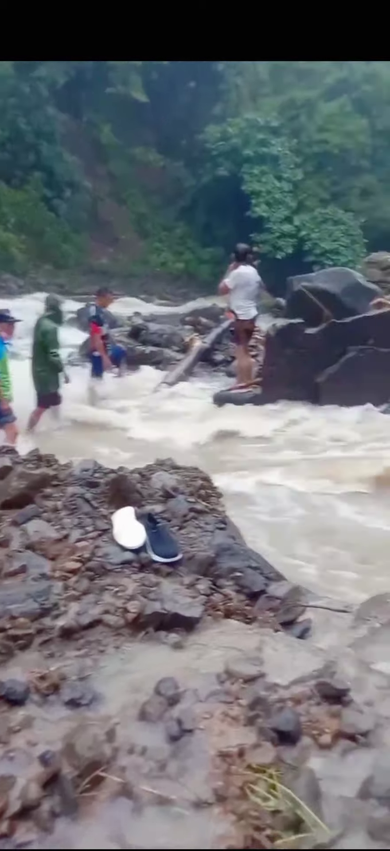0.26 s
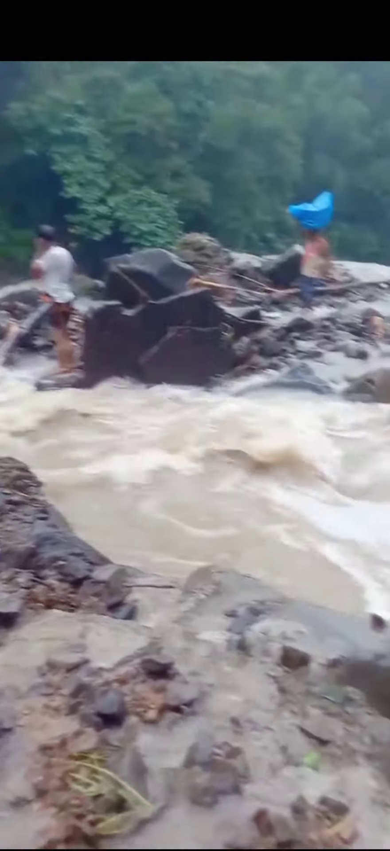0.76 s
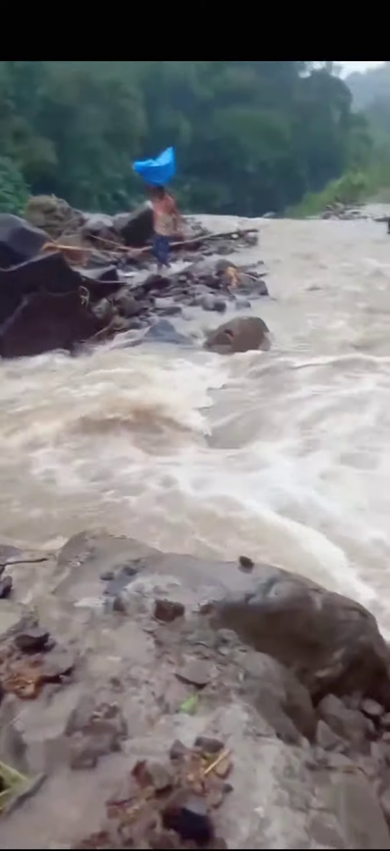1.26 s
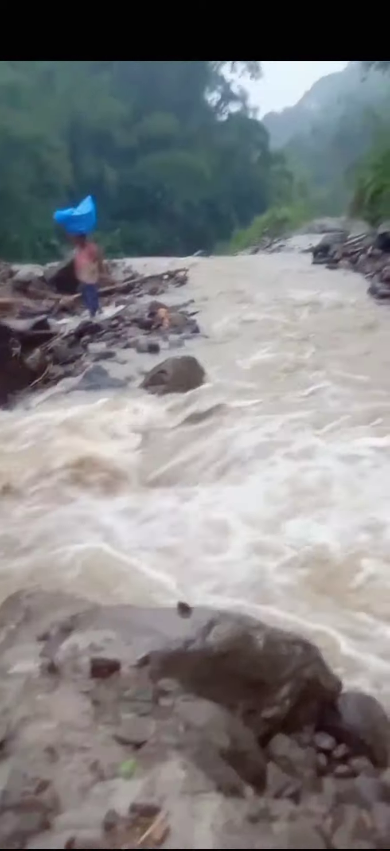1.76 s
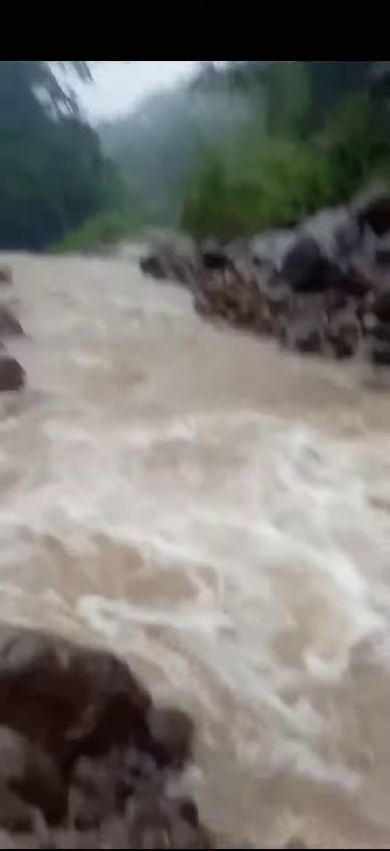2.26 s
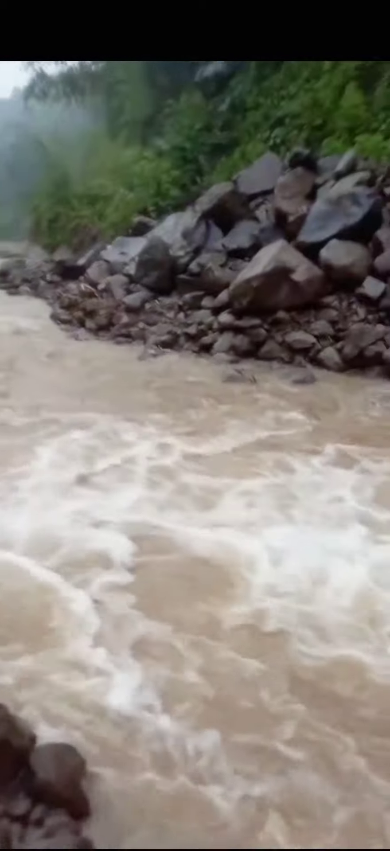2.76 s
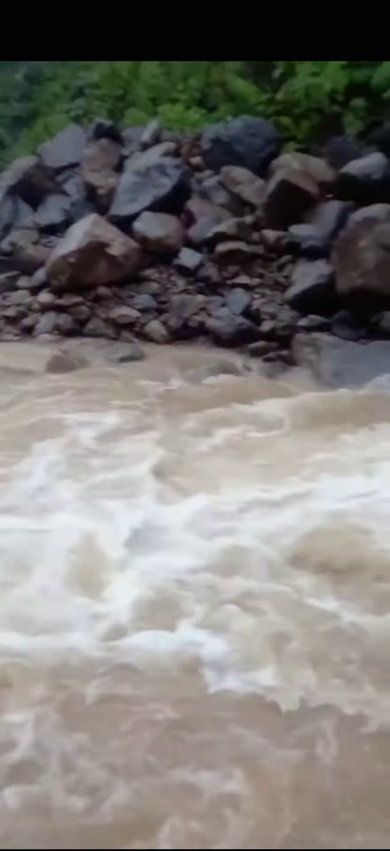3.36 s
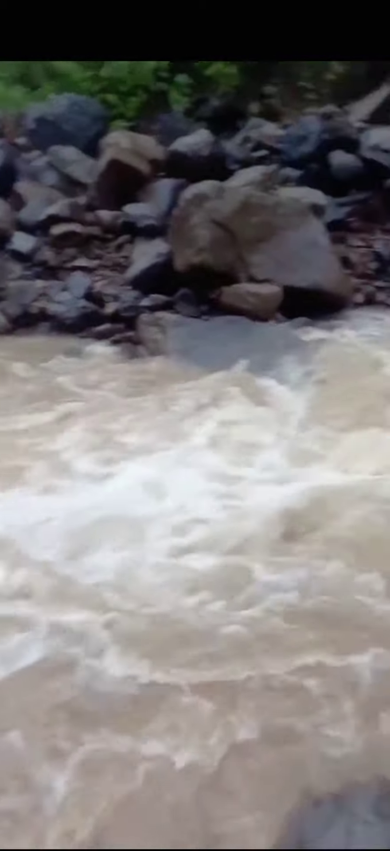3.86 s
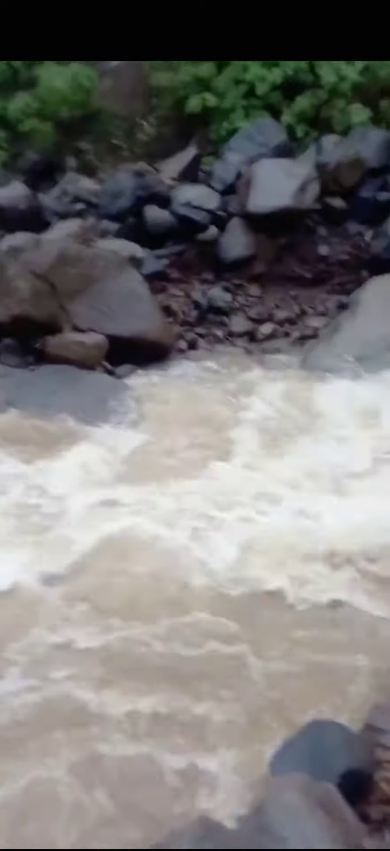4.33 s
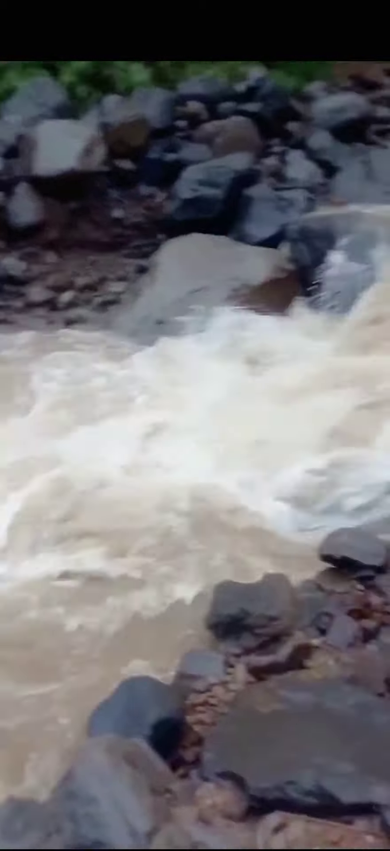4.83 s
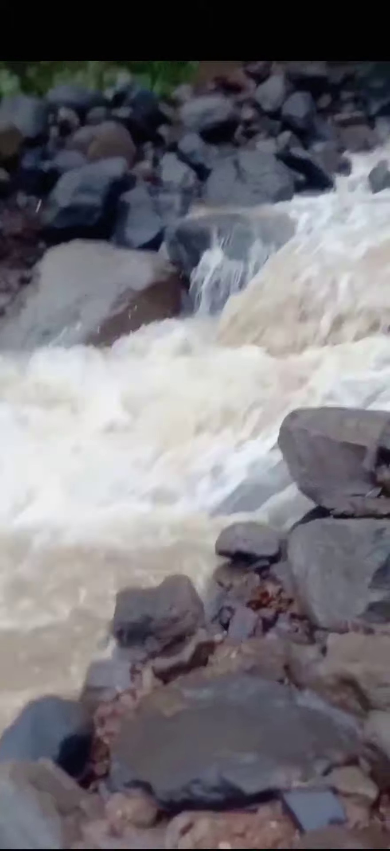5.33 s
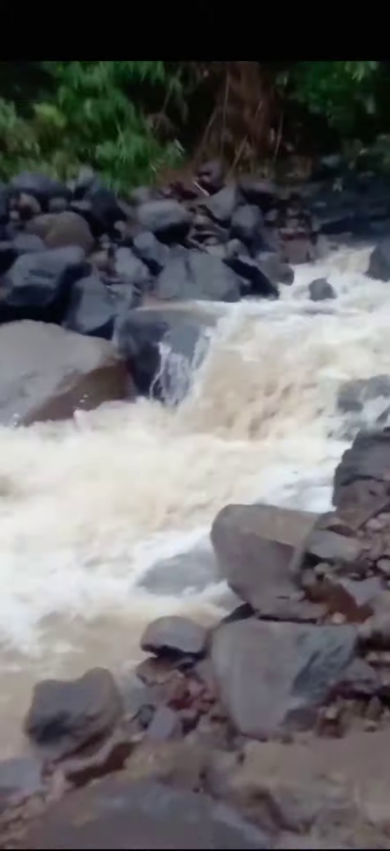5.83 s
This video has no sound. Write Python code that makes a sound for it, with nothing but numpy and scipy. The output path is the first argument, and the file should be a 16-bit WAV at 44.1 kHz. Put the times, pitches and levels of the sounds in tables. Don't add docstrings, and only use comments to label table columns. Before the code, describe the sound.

Dense, steady whitewater rush close by, peppered with irregular sharp drop hits on the microphone that briefly duck it, turning hissier towards the end.

```python
import sys
import numpy as np
from scipy import signal
from scipy.fft import rfft, irfft, next_fast_len
from scipy.io import wavfile
from scipy.ndimage import uniform_filter1d, minimum_filter1d

SR = 44100
rng = np.random.default_rng(int(sys.argv[2]) if len(sys.argv) > 2 else 0)


def wrap_up_sound(samples):
    columns = np.atleast_2d(samples).T
    tamed = np.clip(columns, -1, 1)
    steps = np.round(tamed * 32767).astype(np.int16)
    wavfile.write(sys.argv[1], SR, steps)


def invert_db(x):
    u = np.asarray(x, float) / 20
    return 10 ** u


N = 268569

# time_s, roar_db, facing (0 = away from the cascade, 1 = towards it)
PHONE_TURN = [(0.0, -16, 0.3), (0.17, -15, 0.1), (0.4, -18, 0.27), (1.17, -16, .1), (1.83, -16.5, 0.2),
              (2.27, -14, 0.39), (3.21, -13, 0.2), (3.88, -14, 0.44), (4.21, -15, 0.62), (4.43, -16.5, 0.5),
              (4.92, -18.5, 0.63), (5.329, -20.5, 0.83), (5.77, -20, 0.87), (6.09, -21.5, 1)]
# pitch_hz, level_db (per Hz)
CHURN_COLOUR = [(60, -53.5), (160, -48), (195, -35), (265, -29), (320, -12.5), (422, -19), (533, -12),
                (655, -5), (741, -6), (870, 2.5), (995, -7.5), (1180, 0.5), (1500, -7.5), (1900, -37.5)]
ROAR_COLOUR = [(850, -46), (1450, -30), (1560, -16.5), (1920, 0), (2310, 1.5), (2620, -3), (3430, -11),
               (3890, -33.5), (4170, -36.5), (5420, -75), (9170, -120)]
# pitch_hz, level_db (per Hz)
RIDGE_COLOUR = [(1900, -39.5), (2200, -10), (2450, 0.5), (2750, -9.5), (3100, -41)]
# pitch_hz, level_db (per Hz)
CASCADE_COLOUR = [(2900, -24), (3400, 5.5), (3750, -5), (4200, -17), (5200, -21.5), (6200, -28)]
SPRAY_COLOUR = [(3500, -30.5), (4100, -4.5), (5000, -3), (6000, -3.5), (7000, -9), (7700, -13),
                (8200, -19.5), (9000, -28.5), (9700, -18.5), (10300, -25), (10900, -23), (11500, -33),
                (14000, -35), (15500, -44)]
# pitch_hz, level_db (per Hz)
BOOM_COLOUR = [(15, -27), (60, -34), (100, -28), (115, -33), (190, -20), (207, -1.5), (225, 0), (238, -0.5),
               (262, -21.5), (300, -48)]
# hit_s, duck_db
OVERLOADS = [(0.351, 9.5), (.7321, 7), (.9109, 3.5), (2.3907, 2.5), (2.532, 2.5), (3.4508, 7), (4.1081, 9),
             (4.1357, 4.5), (4.3237, 4), (4.415, 10), (4.5465, 4), (5.2066, 7.5)]
# peak_s, tick_db, port_ring_db, port_ring_hz
DROPS = [(.0285, -36, -10, 2110), (.1595, -33, -6, 2450), (.1715, -33, -5, 2370), (.3515, -22, -2, 2300),
         (.5148, -32, -8, 2460), (.7325, -25, -5, 2620), (.9105, -22, -2, 2800), (1.4375, -25, -4, 3200),
         (1.4902, -32, -6, 2320), (1.5202, -20, -2, 2950), (2.0507, -31, -5, 2300), (2.2579, -30, -3, 2370),
         (2.3907, -27, -1, 2400), (2.5312, -28, -1.5, 3040), (2.7788, -28, -4, 2350),
         (2.9664, -34, -5, 2370), (3.0231, -31, -9, 2460), (3.3202, -28, -4, 2370),
         (3.4512, -17, -1.5, 2300), (3.5023, -33, -8, 2070), (3.5208, -28, -9, 2330),
         (3.8302, -32, -8, 2320), (4.1081, -31, -4, 2850), (4.1357, -17, -6, 3300), (4.3237, -23, -4, 2150),
         (4.4129, -22, -3, 2400), (4.4908, -30, -4, 2260), (4.5465, -27, -2, 2600),
         (5.2066, -31, -11, 2370), (5.7888, -29, -7, 2340)]
# pitch_hz, level_db
TICK_COLOUR = [(2500, -25), (3600, -4.5), (4500, 1.5), (5500, -4.5), (6500, -12.5), (8000, -14.5),
               (9000, -30.5), (11000, -33), (15500, -48.5)]
# pitch_hz, level_db
PORT_EDGE = [(300, 0), (3700, 0), (4200, -16), (6000, -30), (16000, -60)]
# peak_s, thud_db, thud_hz, knock_db
THUDS = [(.0276, -13, 760, -20), (.1741, -12.5, 760, -11), (.3537, -18, 830, -12), (.7342, -9, 870, -15),
         (.9122, -17, 940, -18), (1.4907, -12, 830, -19), (2.0537, -21, 870, -9), (2.3936, -14, 850, -17),
         (2.5985, -14.5, 870, -10), (2.7823, -19, 1050, -15), (2.9695, -18, 1000, -19),
         (3.0247, -16, 860, -18), (3.3223, -15, 810, -15), (3.5218, -12, 1000, -11),
         (3.8294, -17.5, 820, -20), (4.1101, -13, 830, -18), (4.1376, -17, 1150, -10),
         (4.3247, -25, 1060, -11), (4.4141, -17, 1050, -9), (4.4922, -16, 910, -14),
         (4.6441, -27, 1000, -15), (5.1744, -18.5, 880, -17), (5.2082, -15, 990, -13),
         (5.7889, -18, 1050, -10)]


def river():
    time_s, *controls = np.transpose(PHONE_TURN)
    roar_db, facing = (np.interp(np.arange(N) / SR, time_s, c) for c in controls)
    churn_db = roar_db - 16 + 4.5 * facing ** 2
    spray_db = roar_db - 35 + 8.5 * facing ** 2
    spray_db += 0.18 * (roar_db - roar_db.mean())
    cascade_db = roar_db - 36.5 + 28 * facing
    ridge_db = -24 + 22 * facing

    flicker = evened(uniform_filter1d(rng.standard_normal(N // 64 + 8), size=8))
    churn = water(CHURN_COLOUR, 0.93, 0.92, flicker, pops_per_s=160, pops_db=-6, pops_spread_db=6.5)
    roar = water(ROAR_COLOUR, 0.89, 0.2, flicker, pops_per_s=330, pops_db=-14, pops_spread_db=1)
    ridge = water(RIDGE_COLOUR, 1.1, 0.6, flicker, pops_per_s=160, pops_db=-7, pops_spread_db=2.5)
    cascade = water(CASCADE_COLOUR, 1.8, 0.73, flicker, pops_per_s=730, pops_db=-6.5, pops_spread_db=1.5)
    spray = water(SPRAY_COLOUR, 1.3, 0.35, flicker, pops_per_s=200, pops_db=-13.5, pops_spread_db=4.5)

    duck_db = limiter_db()
    low = invert_db(churn_db - 0.65 * duck_db) * (churn + boulder_boom(facing))
    middle = invert_db(roar_db - duck_db) * (roar + invert_db(ridge_db) * ridge)
    treble = dropouts(invert_db(spray_db) * spray + invert_db(cascade_db) * cascade)
    return low + middle + invert_db(-1.3 * duck_db) * treble


def water(colour, patchy_db, flicker_db, flicker, pops_per_s, pops_db, pops_spread_db):
    real, imaginary, patches = rng.standard_normal((3, 129, len(flicker)))
    patches = uniform_filter1d(uniform_filter1d(patches, size=3, axis=0), size=30, axis=1)
    level_db = patchy_db * evened(patches) + flicker_db * flicker
    grains = (real + 1j * imaginary) * invert_db(level_db)
    wash = evened(signal.istft(grains, nperseg=256, noverlap=192)[1][:N])

    draw, size, sign = rng.random((3, N))
    pops = invert_db(-pops_spread_db * np.log(size + 0.04)) * np.sign(sign - 0.5)
    pops *= draw < pops_per_s / SR
    spit = np.exp(-np.arange(200) / SR / 0.0017) * rng.standard_normal(200)
    bursts = evened(signal.oaconvolve(pops, spit)[:N])
    return evened(coloured(wash + invert_db(pops_db) * bursts, colour))


def boulder_boom(facing):
    surge = uniform_filter1d(uniform_filter1d(rng.standard_normal(N), size=3000), size=3000)
    hum = evened(coloured(rng.standard_normal(N), BOOM_COLOUR))
    return invert_db(-30.5 + 4.1 * evened(surge) - 4.5 * facing) * hum


def dropouts(hiss):
    hz, t, z = signal.stft(hiss, SR, nperseg=1024, noverlap=768)
    hz = hz[:, None]
    notch_hz = 4450 + 760 * np.maximum(t - 4.5, 0)
    near_notch = np.exp(-((hz - notch_hz) / 280) ** 2)
    notch_chance = 0.094 + 0.6 * np.exp(-((t - 5.4) / 0.6) ** 2)
    hit_s, depth_db = np.transpose(OVERLOADS)[:, :, None]
    shaken = (depth_db * (t > hit_s) * np.exp(-abs(t - hit_s) / 0.08)).sum(axis=0)
    chance = 0.015 + 0.022 * shaken + near_notch * notch_chance
    blocks = rng.random((len(hz) // 6 + 1, len(t) // 6 + 1)).repeat(6, axis=0).repeat(6, axis=1)
    lost = blocks[:len(hz), :len(t)] < chance

    nearby = uniform_filter1d(uniform_filter1d(abs(z), size=15, axis=0), size=9, axis=1)
    weak = (abs(z) < 0.9 * nearby) & (hz > 4000)
    return signal.istft(z * invert_db(-22 * lost - 7 * weak), SR, nperseg=1024, noverlap=768)[1][:N]


def limiter_db():
    t = np.arange(0, N + 32, 32) / SR
    hit_s, depth_db = np.transpose(OVERLOADS)[:, :, None]
    after_s = np.maximum(t - hit_s - 0.012, 0)
    early = np.clip((t - hit_s + 0.008) / 0.006, 0, 1)
    late = np.clip((t - hit_s - 0.002) / 0.008, 0, 1)
    recovery = 1.2 * np.exp(-after_s / 0.013) + 0.23 * np.exp(-after_s / 0.13)
    duck_db = depth_db * (0.35 * early + 0.65 * late) * recovery
    drop_s = np.array(DROPS)[:, :1]
    flinch_db = 5.5 * np.exp(-((t - drop_s + 0.001) / 0.0045) ** 2)
    return np.interp(np.arange(N) / SR, t, duck_db.sum(axis=0) + flinch_db.sum(axis=0))


def drops():
    out, t = np.zeros(N), np.arange(1024) / SR
    snap = 2.5 * blow(t, 0.0047, 0.00003, 0.00005)
    spatter = 0.8 * blow(t, 0.005, 0.0005, 0.0012) + 0.17 * blow(t, 0.005, 0.002, 0.0035)
    for peak_s, tick_db, port_db, port_hz in DROPS:
        tick = coloured(snap + spatter * rng.standard_normal(len(t)), TICK_COLOUR)
        hard_db = tick_db + 22
        bright_db = 14 * (2700 - port_hz) / 1000 + 0.5 * hard_db
        tick = coloured(tick, [(20, 0), (4500, 0), (9000, bright_db), (22050, hard_db)])
        tones = ring(t, port_hz, 0.14) + 0.25 * ring(t, 3450, 0.08)
        port = coloured(blow(t, 0.005, 0.0005, 0.0017) * tones / 1.1, PORT_EDGE)
        add(out, peak_s - 0.005, invert_db(tick_db) * tick / abs(tick).max() + invert_db(port_db) * port)
    return out


def thuds():
    out, t = np.zeros(N), np.arange(1024) / SR
    knock = blow(t, 0.0044, 0.0007, 0.0018) * ring(t, 1600, 0.22)
    for peak_s, thud_db, thud_hz, knock_db in THUDS:
        tones = ring(t, thud_hz, 0.18)
        tones += 0.4 * ring(t, 0.75 * thud_hz, 0.2) + 0.3 * ring(t, 1.4 * thud_hz, 0.2)
        thud = blow(t, 0.006, 0.0009, 0.0034) * tones / 1.1
        add(out, peak_s - 0.0067, invert_db(thud_db + 1.5) * thud + invert_db(knock_db - 0.5) * knock)
    return coloured(out, [(40, -41.5), (150, -29), (400, -6.5), (16000, 13.5)])


def ring(t, hz, sag):
    pitch_hz = hz * (1 - sag * np.tanh((t - 0.006) / 0.002))
    return np.sin(2 * np.pi * np.cumsum(pitch_hz) / SR)


def blow(t, peak_s, rise_s, fall_s):
    rise = (np.minimum(t - peak_s, 0) / rise_s) ** 2
    fall = (np.maximum(t - peak_s, 0) / fall_s) ** 1.4
    return np.exp(-rise - fall)


def coloured(x, colour):
    size = next_fast_len(len(x))
    hz, level_db = np.transpose(colour)
    bins_hz = np.fft.rfftfreq(size, 1 / SR)
    gain_db = np.interp(np.log(bins_hz + 1), np.log(hz + 1), level_db, left=-120, right=-120)
    return irfft(rfft(x, size) * invert_db(gain_db), size)[:len(x)]


def evened(x):
    return x / np.sqrt(np.mean(x ** 2) + 1e-20)


def add(mix, start_s, sound):
    part = mix[max(round(start_s * SR), 0):][:len(sound)]
    part += sound[:len(part)]


def scene():
    return (river() + drops() + thuds())[None]


def roll_off(x):
    return signal.sosfilt(signal.butter(12, 15750, fs=SR, output="sos"), x)


def record(dry):
    over_db = np.maximum(20 * np.log10(abs(dry) + 1e-9) + 1.6, 0)
    dip_db = uniform_filter1d(-minimum_filter1d(-over_db, size=201), size=201)
    return roll_off(dry / invert_db(dip_db))


dry = scene()
out = record(dry)
wrap_up_sound(out)
```